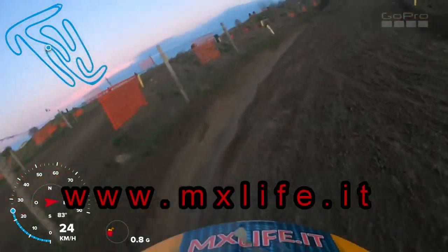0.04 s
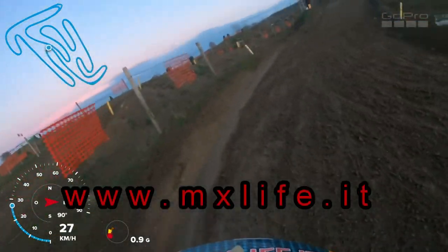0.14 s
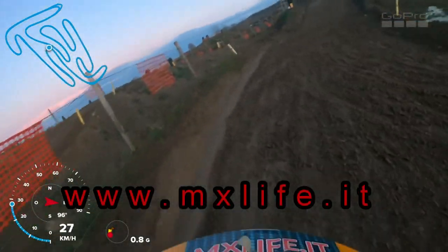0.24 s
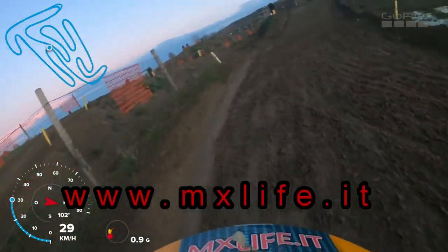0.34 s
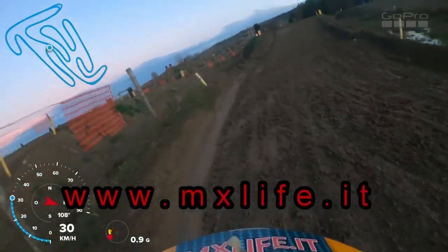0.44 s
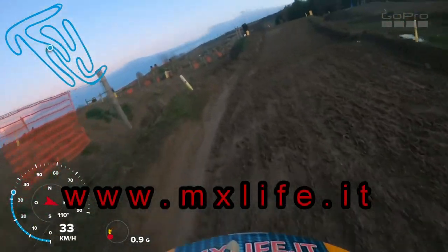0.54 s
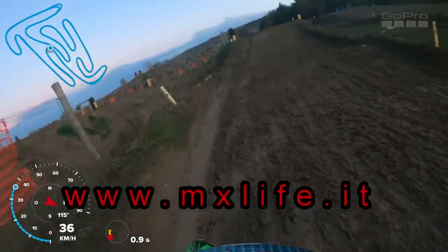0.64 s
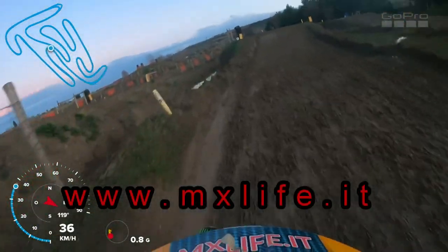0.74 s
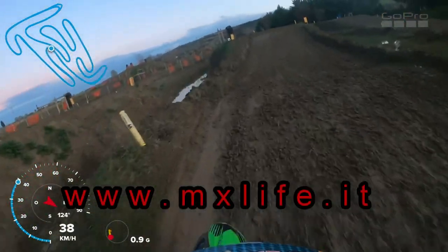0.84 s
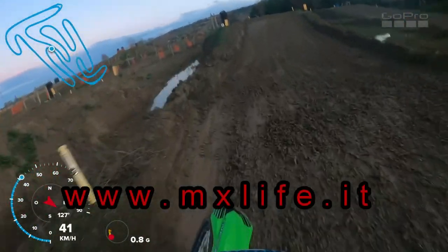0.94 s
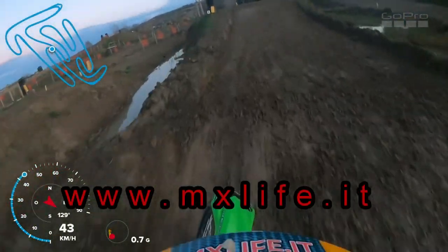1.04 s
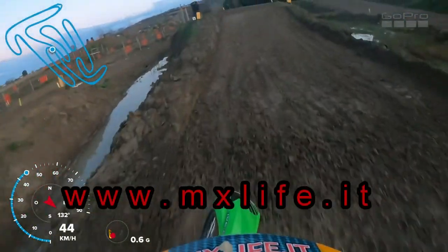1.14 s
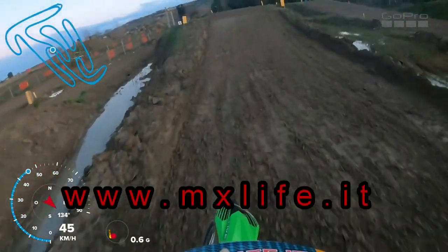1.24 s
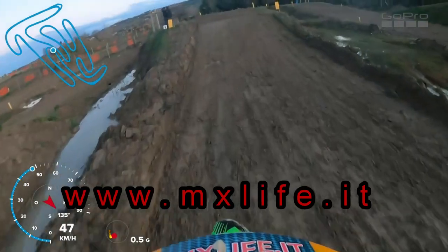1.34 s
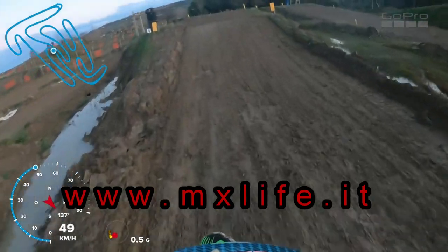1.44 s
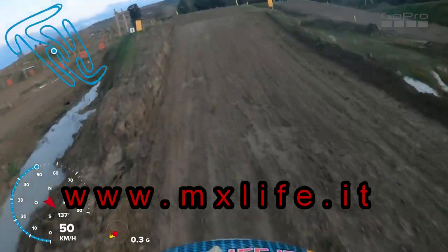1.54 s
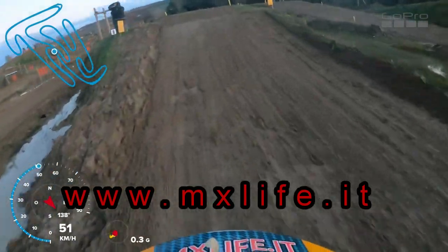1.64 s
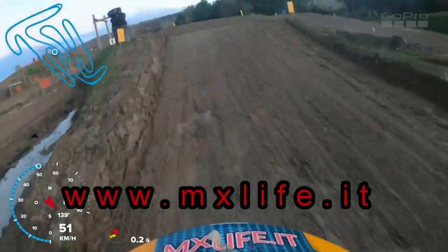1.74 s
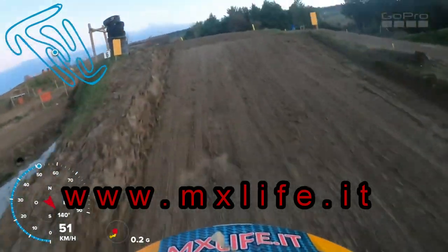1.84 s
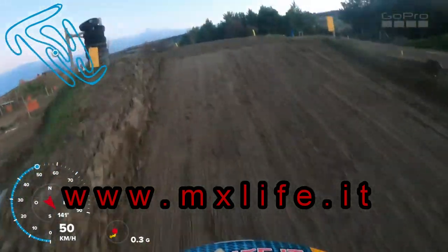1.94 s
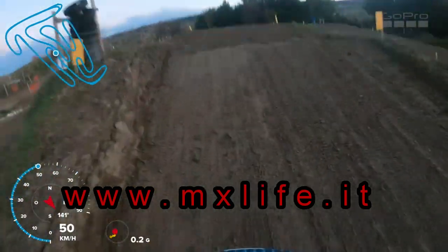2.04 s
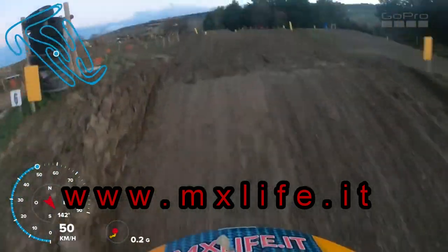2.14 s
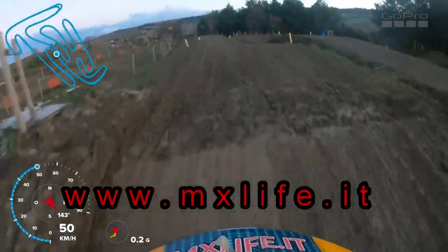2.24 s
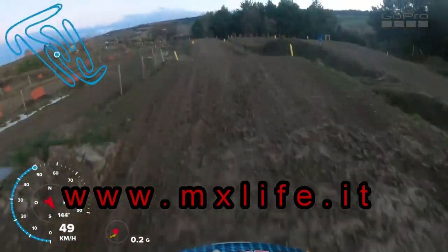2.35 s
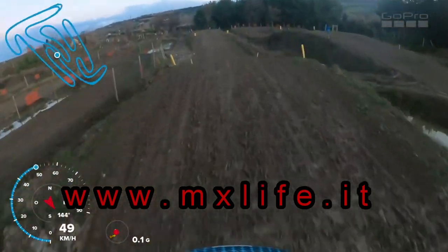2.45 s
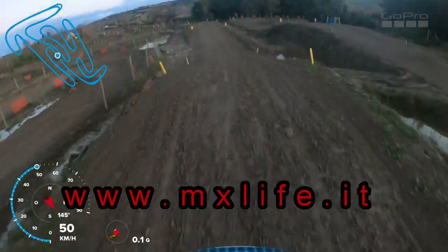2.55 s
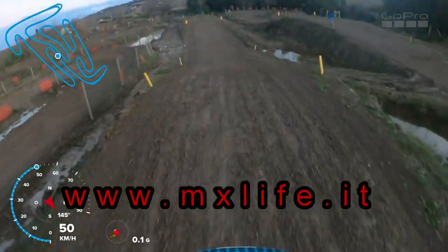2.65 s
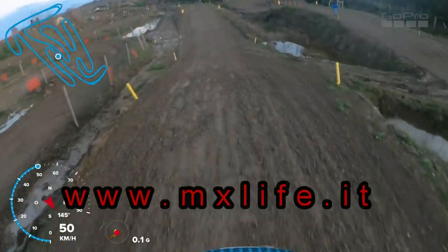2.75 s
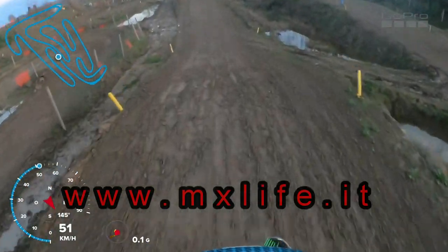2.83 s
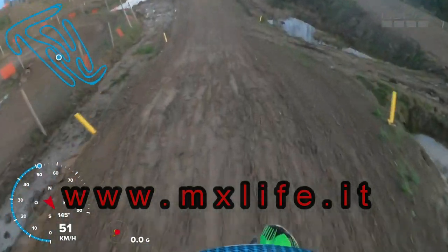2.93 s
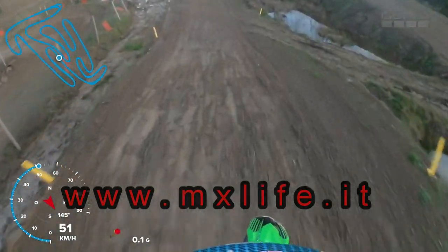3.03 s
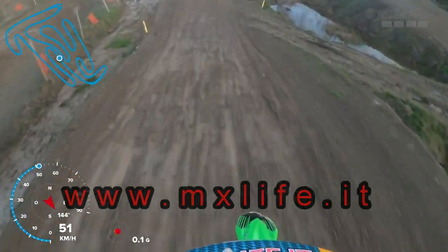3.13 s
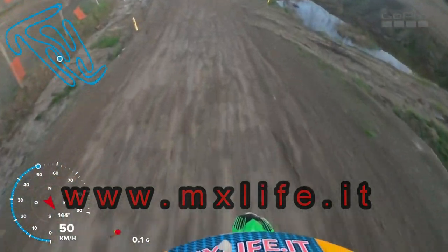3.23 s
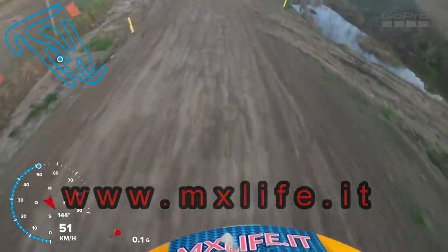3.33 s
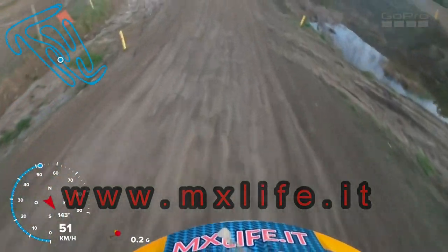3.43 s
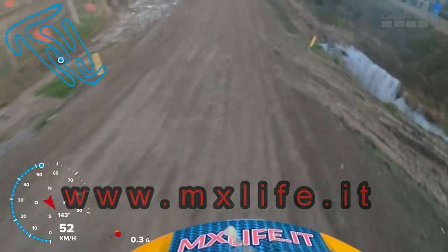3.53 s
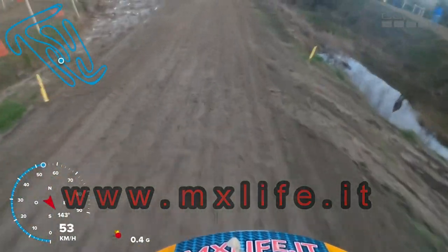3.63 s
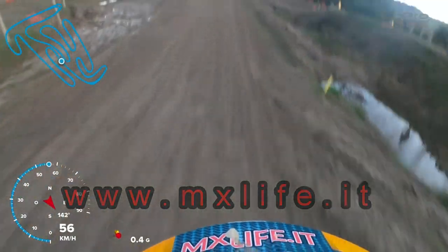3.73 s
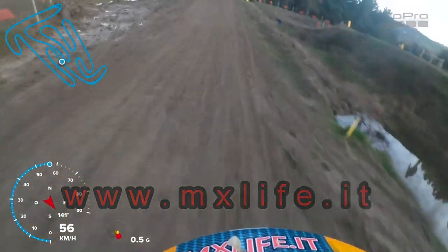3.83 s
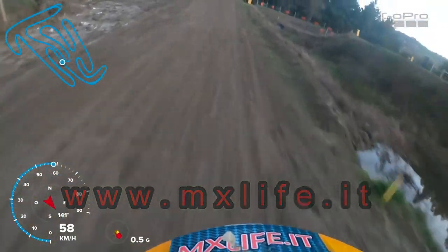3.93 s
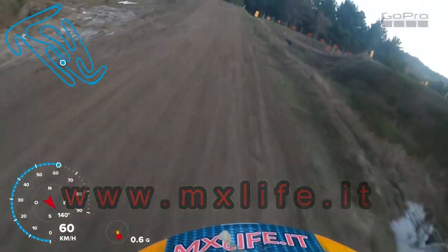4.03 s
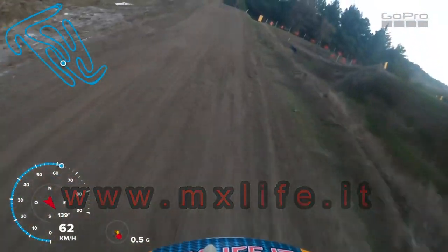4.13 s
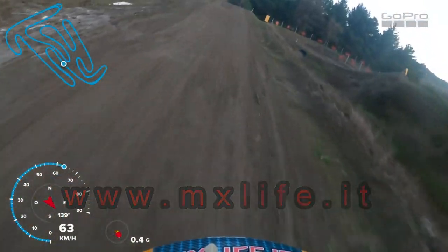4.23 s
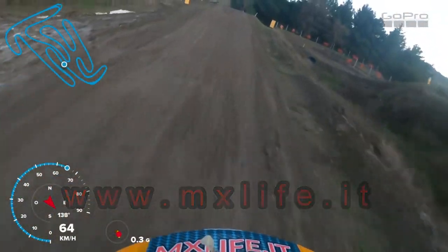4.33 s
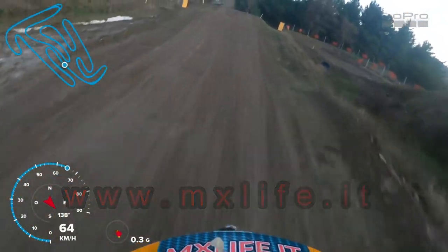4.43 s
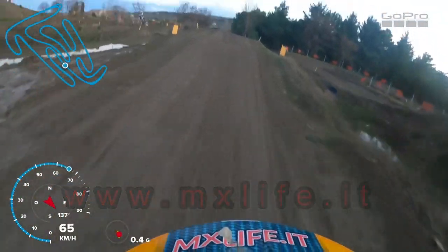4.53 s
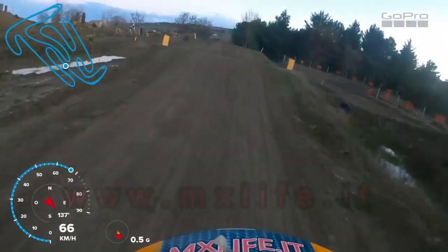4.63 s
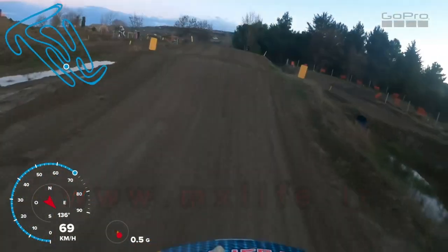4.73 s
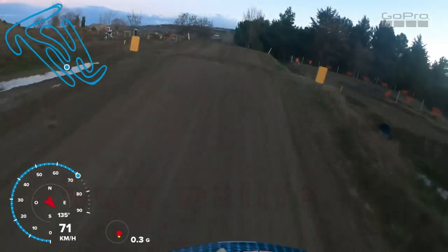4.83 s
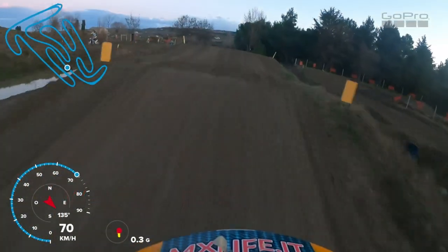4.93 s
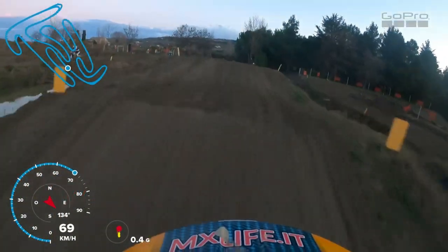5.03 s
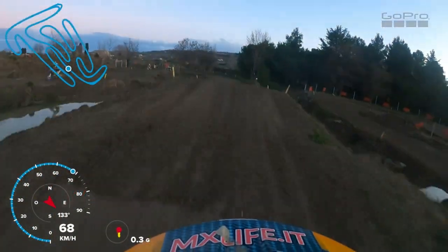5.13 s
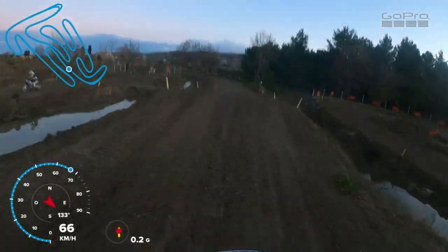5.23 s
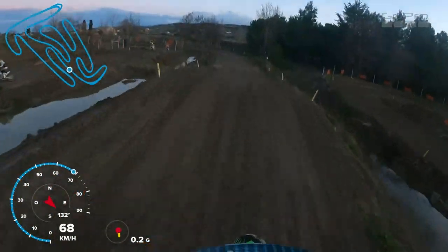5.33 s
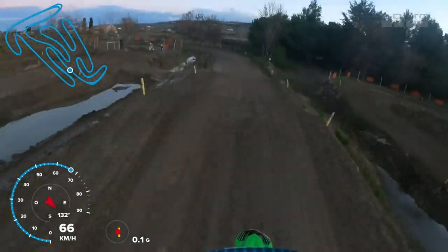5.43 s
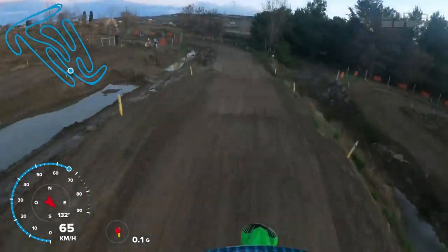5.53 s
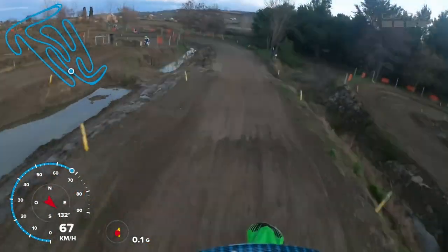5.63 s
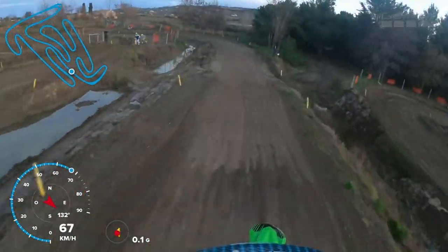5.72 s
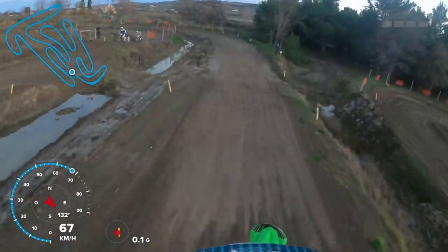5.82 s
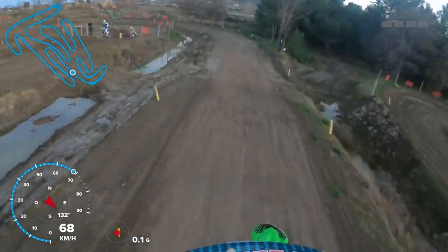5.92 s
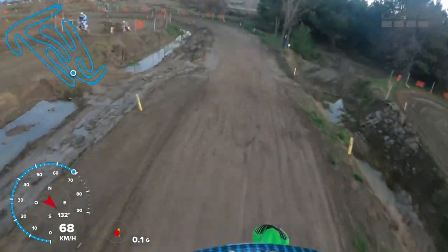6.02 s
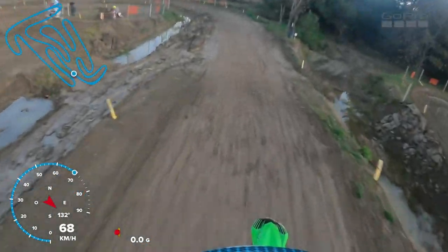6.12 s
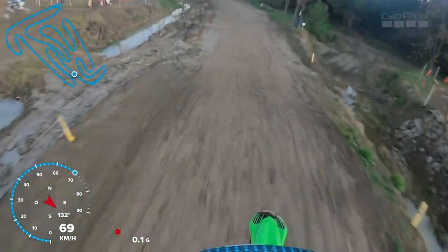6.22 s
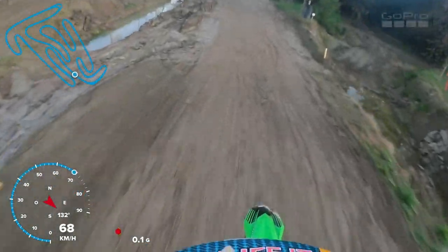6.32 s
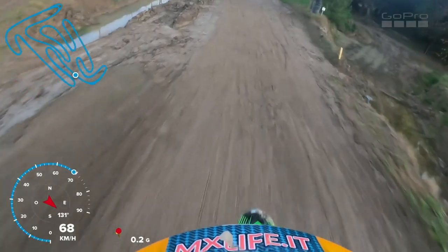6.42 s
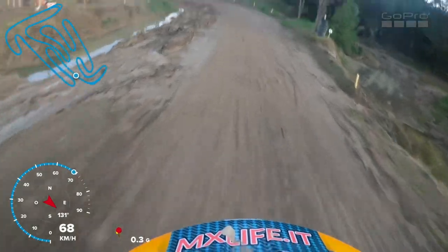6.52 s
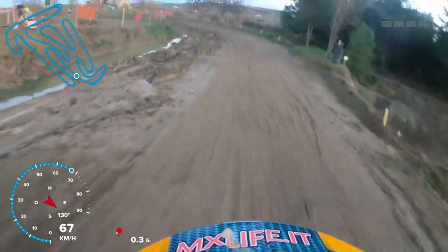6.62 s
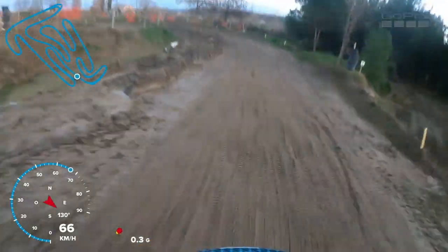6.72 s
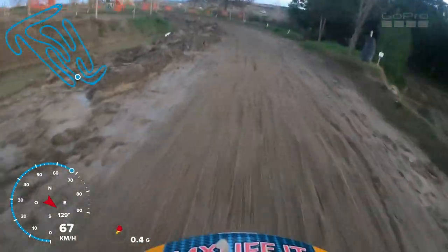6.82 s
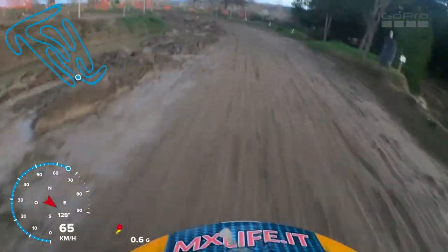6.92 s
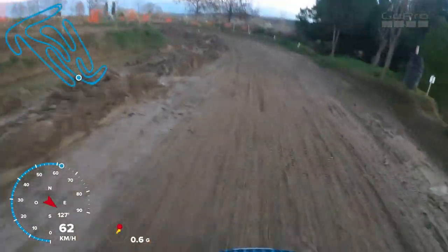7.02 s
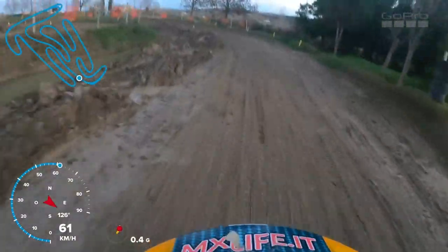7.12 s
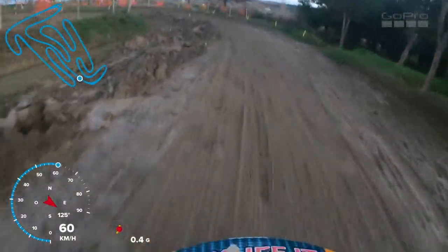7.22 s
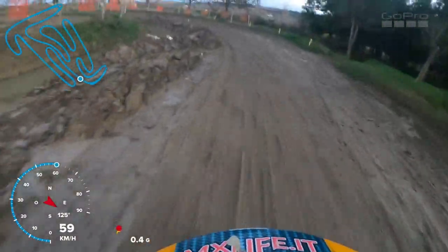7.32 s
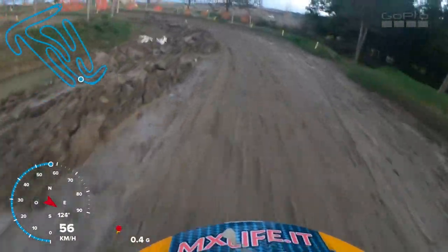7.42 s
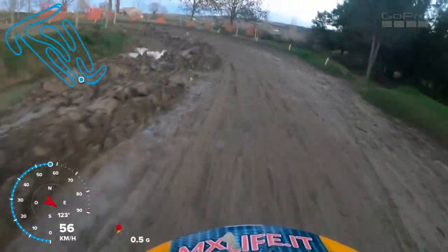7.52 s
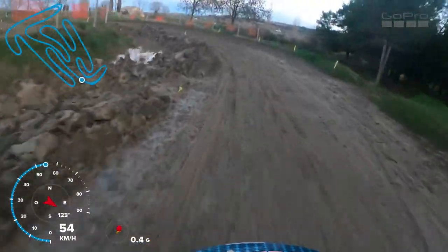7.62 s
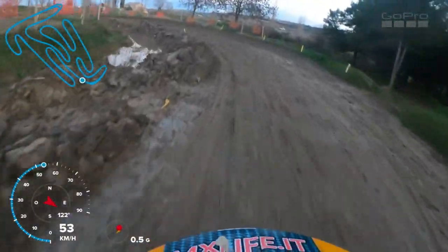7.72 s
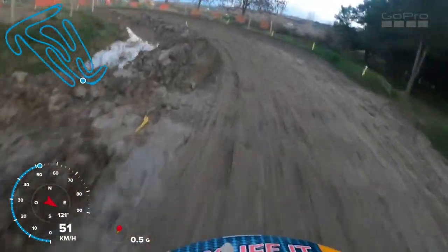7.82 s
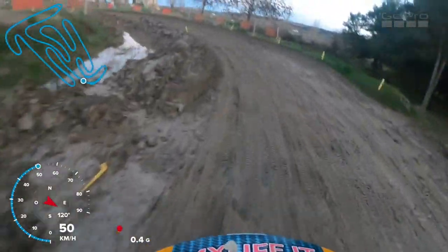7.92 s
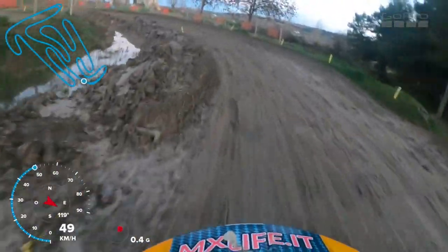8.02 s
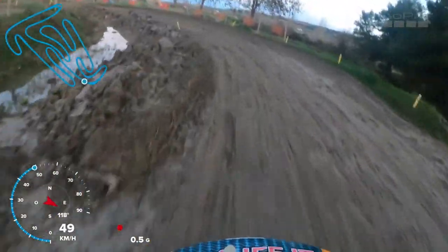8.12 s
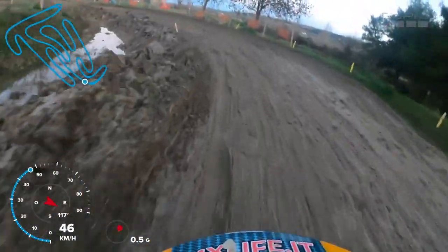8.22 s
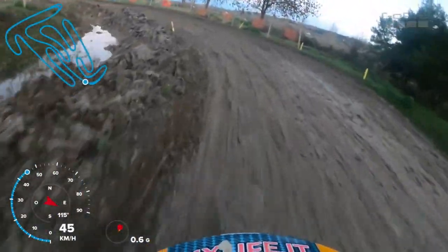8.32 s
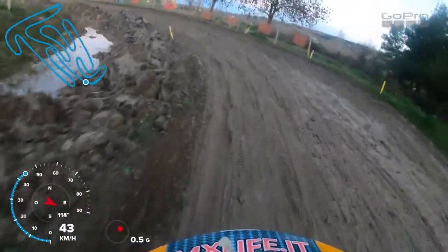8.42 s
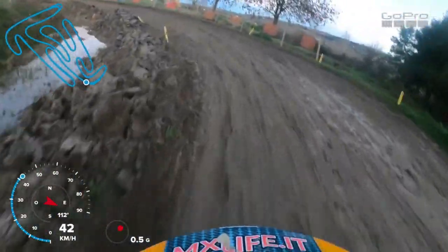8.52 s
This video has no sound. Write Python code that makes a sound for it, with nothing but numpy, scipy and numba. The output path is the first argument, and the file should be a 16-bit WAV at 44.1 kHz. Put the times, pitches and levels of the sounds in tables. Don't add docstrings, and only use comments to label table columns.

```python
import sys
import numpy as np
from scipy import signal
from scipy.fft import rfft, irfft
from scipy.io import wavfile
from scipy.ndimage import uniform_filter1d
from numba import njit

SR = 44100
rng = np.random.default_rng(int(sys.argv[2]) if len(sys.argv) > 2 else 0)


def voltage_ratio(level):
    return 10 ** (np.asarray(level, float) / 20)


def wav_record(signal):
    frames = np.transpose(np.atleast_2d(signal))
    bounded = np.clip(frames, -1, 1)
    quanta = np.round(bounded * 32767).astype(np.int16)
    wavfile.write(sys.argv[1], SR, quanta)


N = 377496


def level(x, db):
    return x * voltage_ratio(db) / np.sqrt(np.mean(x ** 2))


def summed(*dbs):
    return 10 * np.log10(sum(voltage_ratio(2 * db) for db in dbs))


def moments():
    return np.arange(0, N / SR + .002, .002)


def columns(table):
    s, *cols = np.transpose(table)
    return [np.interp(moments(), s, c) for c in cols]


def fine(*controls):
    return [np.interp(np.arange(N) / SR, moments(), c) for c in controls]


def walk(rate):
    k = int(SR / rate)
    held = np.repeat(rng.standard_normal(N // k + 1), k)
    return uniform_filter1d(uniform_filter1d(held, k), k)[:N]


def ring(x, hz, width):
    return signal.lfilter(*signal.iirpeak(hz, hz / width, fs=SR), x)


@njit
def glide(x, hz, width):
    y, b, l = np.empty(len(x)), 0., 0.
    for i in range(len(x)):
        g, k = np.pi * hz[i] / SR, width / hz[i]
        v = (b + g * (x[i] - l)) / (1 + g * (g + k))
        b, l, y[i] = 2 * v - b, l + 2 * g * v, k * v
    return y


def modes(x, table):
    total = 0
    for k, (f, w, db) in enumerate(table):
        total = total + (-1) ** k * voltage_ratio(db) * ring(ring(x, f, 1.53 * w), f, 1.53 * w)
    return total


def band(x, low_hz, high_hz, order=2):
    return signal.sosfilt(signal.butter(order, [low_hz, high_hz], "band", fs=SR, output="sos"), x)


def colour(x, points, size=4096):
    hz, db = np.transpose(points)
    log_gain = np.interp(np.log(np.arange(size // 2 + 1) * SR / size + 1), np.log(hz), db) * np.log(10) / 20
    cep = irfft(log_gain)
    cep[1:size // 2] *= 2
    cep[size // 2 + 1:] = 0
    return signal.fftconvolve(x, irfft(np.exp(rfft(cep))))[:N]


# t/s, speed [km/h]
WIND_SPEED = [(0, 50), (1, 24), (1.75, 52.3), (2.4, 45), (3.0, 45), (3.26, 47), (3.33, 56), (3.6, 62),
              (4.0, 69), (4.4, 65.5), (4.7, 80), (4.88, 76), (5.2, 73), (5.5, 61.8), (6.5, 80), (7.0, 70),
              (7.2, 65), (7.27, 75), (7.36, 63.8), (8.56, 48)]
# t/s, length/s, buffeting level/dB, mount shake level/dB
JOLTS = [(0.117, 0.094, -42, -34), (0.27, 0.18, -43, -42), (0.696, 0.4, -36, -34.5),
         (0.863, 0.12, -32, -50), (1.05, 0.23, -39, -57), (1.73, 0.1, -58.5, -26.5), (1.94, 0.2, -26, -31),
         (2.206, .2, -39.5, -33.5), (2.386, 0.24, -55, -28.5), (2.995, 0.21, -68, -35),
         (3.495, 0.13, -53, -34.5), (3.7, 0.38, -34, -30.5), (3.97, 0.16, -37, -35),
         (4.217, 0.31, -35.5, -36), (4.597, 0.24, -42, -31.5), (4.798, 0.15, -31, -38),
         (5.12, 0.51, -45, -28), (5.758, 0.11, -61, -28), (6.195, 0.94, -48, -31.5), (6.45, .2, -50, -31),
         (6.683, 0.29, -27, -50), (6.825, 0.12, -44, -28), (6.983, 0.14, -29.5, -47),
         (7.13, 0.21, -27.5, -52), (7.35, 0.076, -33, -28.5), (7.52, 0.17, -41.5, -40),
         (7.696, 0.3, -35, -41), (7.913, 0.11, -42, -32), (8.158, .3, -35.5, -44), (8.49, 0.12, -37, -31.5)]
# t/s, level/dB
VISOR_SONG = [(0, -54.5), (1.2, -51), (2.3, -50.5), (2.8, -64.5), (3.2, -53.5), (3.9, -47.5), (4.4, -50),
              (4.65, -42.5), (5.0, -41.5), (5.5, -52.5), (5.65, -51), (5.9, -49.5), (6.02, -40.5),
              (6.15, -43.5), (6.35, -39.5), (6.55, -50), (6.62, -42.5), (6.9, -51.5), (7.1, -51),
              (7.25, -48), (7.6, -50), (8.56, -54.5)]


def headwind():
    t = moments()
    buffets, shakes = [], []
    for s, long, buffet_db, shake_db in JOLTS:
        bell_db = -26 * ((t - s) / long) ** 2
        buffets.append(bell_db + buffet_db)
        shakes.append(bell_db + shake_db)
    buffet_db = summed(-51.5, *buffets)
    shake_db = summed(-41, *shakes)
    drive_db = -16 + uniform_filter1d(throttle()[1], 1 + int(.12 / t[1]))
    air_db = -58 + 47 * np.log10(columns(WIND_SPEED)[0] / 60)
    hiss_db, port_db = summed(air_db, drive_db), summed(air_db, drive_db - 17.5)
    return fine(hiss_db, port_db, buffet_db, shake_db, *columns(VISOR_SONG))


def wind():
    hiss_db, port_db, buffet_db, shake_db, visor_db = headwind()
    noise = rng.standard_normal((6, N))
    mount_hz, mount_width = 74.5, 21
    visor_hz, visor_width = 622, 24
    buffet = level(band(noise[0], 18, 40) * voltage_ratio(walk(9)), buffet_db - 2)
    shake = ring(ring(noise[1], mount_hz, mount_width), mount_hz, 2 * mount_width)
    shake = level(shake, shake_db - 5)
    shell = level(band(noise[5], 110, 368, order=3), hiss_db + 12)
    visor = ring(ring(noise[2], visor_hz, visor_width), visor_hz, 3 * visor_width)
    visor = level(visor * voltage_ratio(1.2 * walk(9)), visor_db)
    hiss = band(noise[3], 2260, 12000, order=1) * voltage_ratio(hiss_db + 1.5 * walk(13) + 1.5 * walk(90))
    whistle = glide(noise[4], 5460 * (1 + .02 * walk(3)), 270.0)
    whistle = level(whistle, 1.369 * port_db + 17 + 1.7 * walk(6.1))
    cavity = level(ring(noise[4], 7900, 180), port_db - 28 + 3 * walk(4))
    return buffet + shake + shell + visor + whistle + cavity, hiss


def landing():
    since = np.clip(np.arange(N) / SR - 1.922, 0, None)
    return -voltage_ratio(-20) * np.sin(2 * np.pi * 16 * since) * np.exp(-since / .09)


# t/s, peak level/dB
SHARP_TICKS = [(0.0204, -67), (0.0802, -63), (0.16, -64), (0.5197, -68), (0.5482, -74), (0.5671, -71),
               (0.635, -71), (0.6888, -73), (0.82, -58), (0.9033, -62), (0.9872, -65), (1.0206, -64),
               (1.073, -73), (1.1079, -67), (1.1538, -60), (1.1872, -63), (1.2745, -75), (1.3244, -62),
               (1.3578, -70), (1.6581, -69), (1.6916, -64), (1.729, -73), (1.8292, -62), (2.0792, -68),
               (2.163, -72), (2.363, -65), (2.4463, -64), (3.0694, -77), (3.3313, -67), (3.5743, -68),
               (3.6536, -63), (3.7374, -66), (4.0083, -67), (4.2443, -61), (4.366, -72), (5.0285, -60),
               (5.0784, -62), (5.1098, -62), (5.4844, -65), (5.9005, -70), (6.4428, -67), (6.7945, -67),
               (7.1352, -73), (7.1536, -71), (7.5687, -68), (7.7109, -75), (7.7802, -69), (8.1943, -69),
               (8.2442, -69), (8.2736, -71)]


def sharp_ticks():
    out = np.zeros(N)
    s, db = np.transpose(SHARP_TICKS)
    out[(s * SR).astype(int)] = voltage_ratio(db + 22)
    out[int(.0004 * SR)] = voltage_ratio(-28)
    return band(out, 5000, 17000, order=1)


# t/s, length/s, knock rate f/Hz, level/dB
CASE_BUZZES = [
    (7.2, .025, 150, -59),
    (7.255, .07, 155, -56),
    (3.43, .05, 160, -64),
]


def case_buzz():
    t = np.arange(N) / SR
    trains = 0
    for s, long, rate_hz, db in CASE_BUZZES:
        swell = np.sin(np.pi * np.clip((t - s) / long, 0, 1))
        knocks = np.sin(np.pi * rate_hz * (t - s)) ** 8
        trains = trains + voltage_ratio(db) * swell * knocks
    return trains * level(band(rng.standard_normal(N), 4600, 6600), 4)


# t/s, firings per second f/Hz
GRIPPING_REVS = [(0, 44.2), (.5, 50.6), (.55, 55.2), (1.14, 65.5), (1.64, 62), (1.96, 71), (2.46, 73.8),
                 (3.02, 60.2), (3.24, 52), (3.7, 68), (4.08, 75.5), (4.9, 80.3), (5.52, 84.4), (5.8, 66.8),
                 (6.12, 55.1), (6.7, 65.5), (7.56, 51.5), (8.56, 52.5)]
# peak t/s, extra f/Hz, rise/s, fall/s
WHEELSPIN = [(.075, 4.6, .06, .04), (.14, -3.8, .04, .06), (.24, 1.2, .05, .05), (.325, -2.6, .05, .04),
             (.41, 1.2, .05, .06), (8.56, -2.3, .12, .01), (1.37, 13.5, .11, .19), (1.8, 24, .15, .095),
             (1.91, -3.8, .03, .03), (1.955, 1.6, .025, .06), (2.095, 8, .07, .045),
             (2.145, -1.5, .03, .03), (2.225, 12.5, .075, .04), (2.54, 12, .065, .41),
             (3.15, 1.5, .04, .04), (2.69, 4, .12, .1), (3.08, -4.7, .06, .16), (3.455, 29.5, .17, .11),
             (4.08, 2, .08, .08), (4.6, 9.2, .12, .14), (5.02, 3.4, .1, .2), (5.22, 3.8, .2, .08),
             (5.38, 5.2, .08, .14), (5.6, -2.3, .08, .2), (6.345, 21, .19, .16), (6.52, 19.5, .16, .075),
             (6.615, -3.8, .04, .06), (6.95, 13.3, .2, .21), (7.32, -6.5, .07, .1), (7.42, -7.9, .1, .08),
             (7.5, -5.5, .08, .06), (8.3, 2.5, .25, .14)]
# t/s, length/s, hop rate f/Hz, depth f/Hz
HOPS = [
    (.545, .45, 6.7, 2.3),
    (3.56, .32, 6.2, -1.4),
    (7.61, .5, 7.6, 1),
]


def revs():
    t = moments()
    hz = columns(GRIPPING_REVS)[0]
    for s, more, up, down in WHEELSPIN:
        hz = hz + np.interp(t, [s - up, s, s + down], [0, more, 0])
    for s, long, rate, depth in HOPS:
        hz = hz + depth * np.sin(2 * np.pi * rate * np.clip(t - s, 0, long)) * (t < s + long)
    return fine(uniform_filter1d(hz, size=7))[0]


# t/s, boom level/dB, bark level/dB
ENGINE_BRAKING = [(0, -43.5, -59), (1.38, -46, -48.5), (1.46, -34.5, -50.5), (1.64, -42, -64.5),
                  (2.25, -39, -40.5), (2.57, -33.5, -46.5), (2.74, -38.5, -50.5), (2.93, -33.5, -55),
                  (3.0, -34.5, -57.5), (3.2, -31.5, -51), (5.4, -38, -44.5), (5.75, -40, -54),
                  (5.84, -37.5, -46.5), (5.98, -38, -47), (6.13, -41, -49), (6.5, -33, -43.5),
                  (7.4, -37.5, -58), (7.6, -34, -54.5), (8.42, -31.5, -57)]
# opens t/s, shuts t/s, boom level/dB at opening, at shutting, bark against boom level/dB
THROTTLE_PULLS = [(0, 0.048, -24, -23, -14.5), (0.083, 0.145, -29, -29, -15.5),
                  (0.154, 0.197, -27, -26, -17), (0.2, 0.294, -23.5, -22, -17),
                  (0.321, 0.355, -37, -35.5, -11.5), (0.373, 0.523, -28, -25, -15),
                  (0.522, 1.353, -22, -23.5, -15), (1.694, 1.823, -28, -23.5, -10.5),
                  (1.795, 1.995, -25.5, -23, -13), (2.029, 2.196, -22, -24.5, -14.5),
                  (2.28, 2.474, -30.5, -28, -13.5), (2.489, 2.53, -29, -28, -19.5),
                  (2.598, 2.653, -29.5, -30.5, -19.5), (3.316, 3.449, -27.5, -22.5, -11),
                  (3.505, 3.62, -30, -22.5, -17.5), (3.648, 4.549, -23, -24.5, -16.5),
                  (4.562, 4.93, -28.5, -27, -10.5), (4.943, 5.155, -19.5, -18.5, -18),
                  (5.156, 5.323, -21.5, -25.5, -15), (5.417, 5.504, -30, -34.5, -21),
                  (6.199, 6.37, -31.5, -29, -11), (6.568, 6.926, -33, -29, -18),
                  (6.968, 7.205, -29, -32, -20.5)]


def throttle():
    t = moments()
    fill_s = empty_s = .038
    boom, bark = (voltage_ratio(db) for db in columns(ENGINE_BRAKING))
    for opens, shuts, first_db, last_db, bark_db in THROTTLE_PULLS:
        gate = np.interp(t, [opens - fill_s, opens, shuts, shuts + empty_s], [0, 1, 1, 0])
        pull = gate * voltage_ratio(np.interp(t, [opens, shuts], [first_db, last_db]))
        boom = np.maximum(boom, pull)
        bark = np.maximum(bark, pull * voltage_ratio(bark_db))
    return 20 * np.log10(boom), 20 * np.log10(bark)


# start t/s, end t/s, scatter level/dB
STUMBLES = [
    (2.2, 2.29, 3),
    (2.52, 2.72, 4),
    (3.03, 3.3, 3),
    (5.82, 6.2, 6),
    (6.36, 6.66, 5),
    (7.2, 7.5, 5),
    (7.55, 8.56, 1.5),
]


def stumble():
    rough_db = 0
    for a, b, db in STUMBLES:
        rough_db = rough_db + np.interp(moments(), [a - .03, a, b, b + .03], [0, db, db, 0])
    return fine(rough_db)[0]


@njit
def fire(hz, stretch, size, p):
    pulses, phase, force, k = np.zeros(len(hz) + 1), np.empty(len(hz)), np.empty(len(hz)), 0
    for i in range(len(hz)):
        step = hz[i] * stretch[k] / SR
        p += step
        if p >= 1:
            p, k = p - 1, k + 1
            pulses[i] += size[k] * p / step
            pulses[i + 1] += size[k] * (1 - p / step)
        phase[i], force[i] = p, size[k]
    return pulses[:-1], phase, force


def crankshaft(hz):
    timing, strength = rng.standard_normal((1000, 2)).T
    stretch = 1 + .003 * timing
    pulses, phase, force = fire(hz, stretch, voltage_ratio(.7 * strength), .4)
    turns = fire(hz, stretch, voltage_ratio(.7 * strength[::-1]), .9)[0]
    return pulses, turns, phase, force


# f/Hz, width f/Hz, level/dB
SILENCER = [(113, 44, -8), (168.8, 42.6, -2.5)]


def silencer(both, hz, boom_db, silencer_db):
    feed = both + level(rng.standard_normal(N), -7)
    tilt_db = .38 * (hz - 66) * np.clip((boom_db + 30) / 7, 0, 1)
    thud = voltage_ratio(-tilt_db) * modes(feed, SILENCER[:1]) - voltage_ratio(tilt_db) * modes(feed, SILENCER[1:])
    thud_db = -32.5 + .079 * (boom_db + 19.5) - .092 * (hz - 65) + silencer_db
    return level(thud, thud_db - 13)


# f/Hz, width f/Hz, level/dB
OVERTONES = [(424, 60, 6), (510, 22, 6.5), (678, 53, 1.5)]


def overtones(firing, hz, boom_db, bark_db, bright_db):
    rush = firing + level(rng.standard_normal(N), -22 - .8 * (boom_db + 24))
    waking = voltage_ratio(np.clip(2.6 * (hz - 70), -9, 0))
    upper = waking * modes(rush, OVERTONES[:1]) - modes(rush, OVERTONES[1:])
    over_db = -35 + .5 * (bark_db + 41) + .018 * (hz - 65) + bright_db
    return level(upper, over_db - 18.5)


def header_and_collector(firing, boom_db, bark_db, header_hz, header_db, collector_db):
    header = glide(glide(firing, header_hz, 160.0), header_hz, 160.0)
    collector = modes(firing, [(384.4, 110, 0)])
    return level(header, bark_db - 16.5 + header_db) + level(collector, boom_db - 28.5 + collector_db)


# f/Hz, width f/Hz, level/dB
PIPE_LOW = [(79.4, 41, -7.5), (211, 38, -4), (255.2, 33.8, 9)]
# f/Hz, width f/Hz, level/dB
PIPE_HIGH = [(292.8, 40, 6), (318.6, 61, -5), (363.2, 49, -14)]


def exhaust_boom(both, hz, boom_db, lean_db, rough_db):
    push = both + level(rng.standard_normal(N), -16 - .35 * (boom_db + 24) + 1.8 * rough_db)
    pipe = voltage_ratio(-lean_db / 2) * modes(push, PIPE_LOW) - voltage_ratio(lean_db / 2) * modes(push, PIPE_HIGH)
    scatter_db = np.clip(-.5 * (boom_db + 26), .4, 1.9) + .25 * rough_db
    boom = level(pipe, boom_db + scatter_db * walk(30))
    steep = 2.1 * np.clip((hz - 48) / 26, .15, 1.1) * band(boom ** 2, 540, 1500)
    return boom + steep


# f/Hz, width f/Hz, level/dB
TAILPIPE = [(1270, 80, -2), (1430, 70, 0), (1580, 70, 0), (1840, 90, -5), (2396, 150, 3)]


def tailpipe_crack(pulses, hz, leak, bark_hz):
    front = pulses / np.sqrt(hz * (1 + leak))
    heat = bark_hz / 1470 * (1 + .012 * walk(12))
    crack = 0
    for k, (f, w, db) in enumerate(TAILPIPE):
        mode_hz = f * (heat if f < 2000 else heat ** .2)
        strike = front * voltage_ratio(db + 1.8 * walk(45) + 2 * walk(5))
        rung = glide(strike, mode_hz, 1.5 * w)
        crack = crack + (-1) ** k * glide(rung, mode_hz, 2.5 * w)
    return level(crack, 7)


def exhaust_bark(pulses, phase, force, hz, bark_db, bark_hz):
    late = int(.011 * SR)
    since = phase / hz
    burst = since / .0026 * np.exp(1 - since / .0026) + .35 * np.exp(-((since - .009) / .002) ** 2)
    leak = .22 * voltage_ratio(-.35 * (bark_db + 40)) * (hz / 60) ** 1.5
    puff = force * (burst + leak) / np.sqrt(hz / 200 + leak + leak ** 2)
    crack = tailpipe_crack(pulses, hz, leak, bark_hz)
    gas = band(puff * rng.standard_normal(N), 870, 3100, order=1)
    gas = level(.54 * gas + glide(gas, bark_hz, 400.0), 0)
    bark = np.roll((crack + gas) * voltage_ratio(bark_db), late)
    cool = .15 * ring(bark, 1100, 190) - .19 * ring(bark, 1600, 500)
    bark = bark + voltage_ratio(-1.6 * (hz - 51).clip(0)) * cool
    clatter = band(np.roll(force * burst, late) * rng.standard_normal(N), 2300, 6100)
    return bark + level(clatter, bark_db + 13.5 - .7 * (hz - 55))


def cam_chain(pulses, turns):
    knocks = level(pulses + turns, 0) + .5 * rng.standard_normal(N)
    return level(modes(knocks, [(2323, 150, 0)]), -40)


# t/s, lean toward the upper pipe modes level/dB,
# crank-turn pulse against the firing level/dB, silencer level/dB, overtones level/dB
HEAD_TURNS = [(0, 9, -6, 11, 13.5), (.5, 4, -3, 6, -1), (.7, 3.5, -15.5, 16, -10), (1.15, 1.5, -28, 4, 0),
              (1.4, -2.5, -17.5, 3.5, 7.5), (1.65, 9.5, -16.5, 14, 5), (1.85, 3, -17.5, 5, -3),
              (2.02, 0.5, -22, -12.5, 6.5), (2.6, -3.5, -4.5, 4.5, 7.5), (3.2, 5.5, -12.5, 9, 7),
              (3.4, 2, -8.5, 11.5, 8), (3.7, -1.5, -22.5, -4.5, 3.5), (4.55, 4, -16, 6, -24.5),
              (5.0, 4, -29, -6, -23), (5.28, 11.5, -7, -6, 1.5), (5.8, -1.5, -22.5, 12.5, -1),
              (6.4, 0, -13.5, -2, 0.5), (7.5, -4, -35, 11, 3)]
# t/s, bark centre
# f/Hz, header ring f/Hz, header level/dB, collector level/dB
GAS_HEAT = [(0, 1258, 494, -6, 6), (.17, 1212, 550, -4, 0), (.26, 1396, 633, -10, -1),
            (.39, 1308, 650, 7, -1), (.57, 1455, 642, 2.5, 2.5), (.78, 1550, 711, 7.5, -2),
            (.95, 1440, 698, 4, 4.5), (1.05, 1520, 715, 7, 3.5), (1.3, 1538, 778, 3.5, 5),
            (1.45, 1497, 703, -5, -6), (1.7, 1448, 640, -2, -8), (1.9, 1457, 652, 2, 12),
            (2.07, 1404, 626, 4, 13.5), (2.3, 1430, 562, -3, 3.5), (2.45, 1377, 936, 6, -1),
            (2.7, 1420, 471, 7, 6), (3.3, 1480, 552, 7.5, -2), (3.5, 1424, 512, 9.5, -7.5),
            (3.67, 1488, 484, 4, -4), (4.0, 1434, 557, 13, -5), (4.5, 1443, 593, 0, -8),
            (4.8, 1456, 637, 3, 0), (5.1, 1493, 510, 12, -6), (5.3, 1508, 633, -3, 0),
            (6.3, 1540, 518, 1, -3), (7, 1500, 493, 0, 4), (8.56, 1548, 420, 1, 6.5)]


def engine():
    hz = revs() * (1 + .004 * walk(14))
    boom_db, bark_db = fine(*throttle())
    lean_db, turn_db, silencer_db, bright_db = fine(*columns(HEAD_TURNS))
    bark_hz, header_hz, header_db, collector_db = fine(*columns(GAS_HEAT))
    pulses, turns, phase, force = crankshaft(hz)
    firing = level(pulses / np.sqrt(hz), 0)
    both = level((pulses + turns * voltage_ratio(turn_db)) / np.sqrt(hz * (1 + voltage_ratio(2 * turn_db))), 0)
    voice = exhaust_boom(both, hz, boom_db, lean_db, stumble())
    voice = voice + overtones(firing, hz, boom_db, bark_db, bright_db)
    voice = voice + silencer(both, hz, boom_db, silencer_db)
    voice = voice + header_and_collector(firing, boom_db, bark_db, header_hz, header_db, collector_db)
    bark = exhaust_bark(pulses, phase, force, hz, bark_db, bark_hz)
    return voice, bark + cam_chain(pulses, turns)


# f/Hz, level/dB
CASE_COLOUR = [(500, 0.5), (900, -7.5), (1080, -7), (1300, -6), (1600, -5), (2050, -13), (2400, -19),
               (2900, -31), (3750, -27), (4500, -38), (5400, -32), (7200, -48.5), (8200, -50), (11000, -73),
               (12000, -48.5), (13500, -61.5)]


def scene():
    voice, bark = engine()
    lows, hiss = wind()
    muffled = colour(bark + voltage_ratio(36) * hiss, CASE_COLOUR)
    return (voice + lows + muffled + sharp_ticks() + case_buzz() + landing())[None]


def top_cut(x):
    return signal.sosfilt(signal.butter(12, 15720, fs=SR, output="sos"), x)


def record(dry):
    soft = np.tanh(1.18 * dry) / 1.214
    soft = soft - .8 * ring(soft, 10900, 1500)
    top = signal.sosfilt(signal.butter(3, 14000, fs=SR, output="sos"), soft)
    return top_cut(top)


dry = scene()
out = record(dry)
wav_record(out)
```